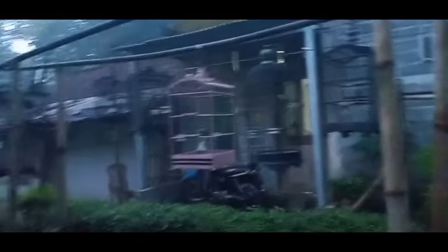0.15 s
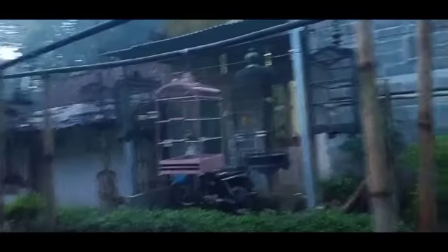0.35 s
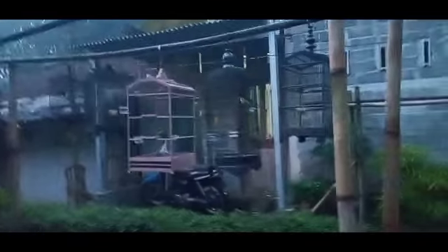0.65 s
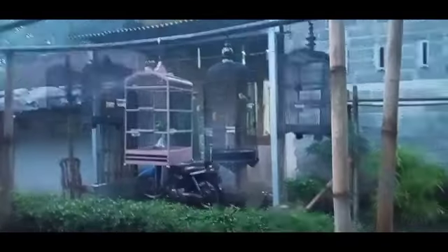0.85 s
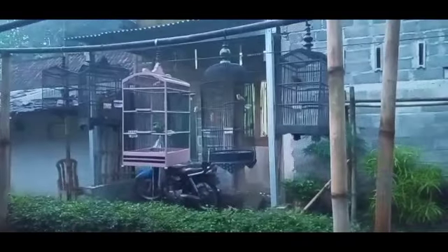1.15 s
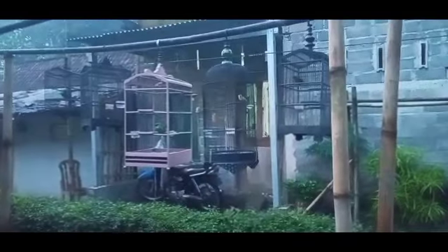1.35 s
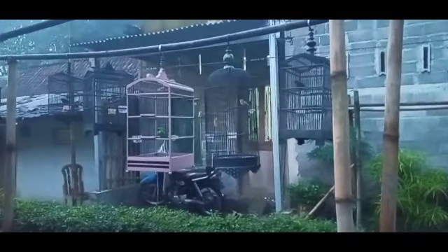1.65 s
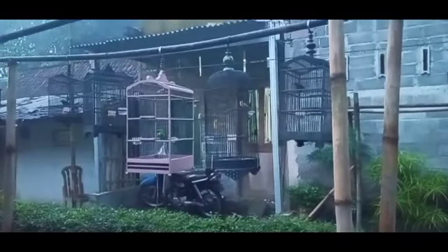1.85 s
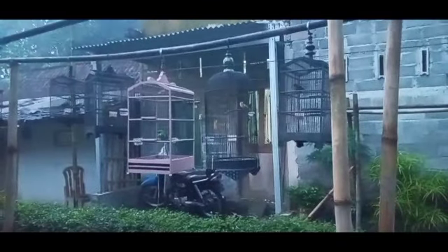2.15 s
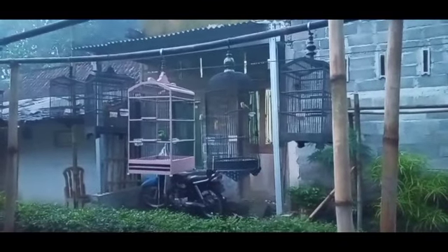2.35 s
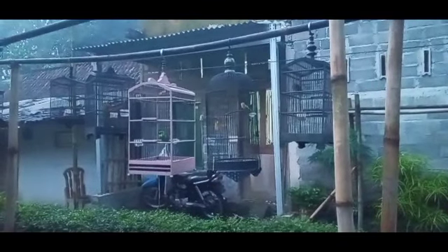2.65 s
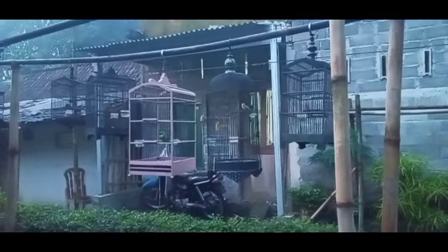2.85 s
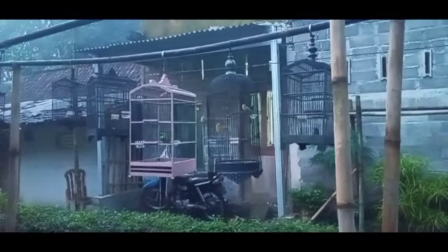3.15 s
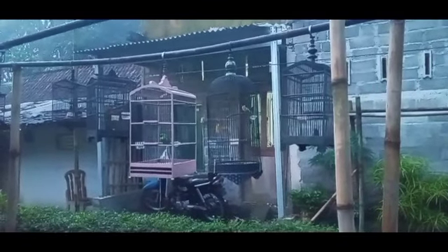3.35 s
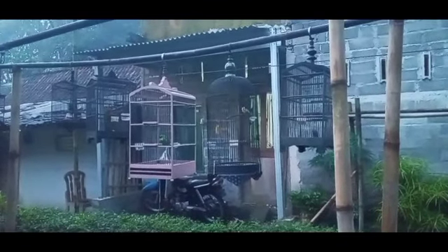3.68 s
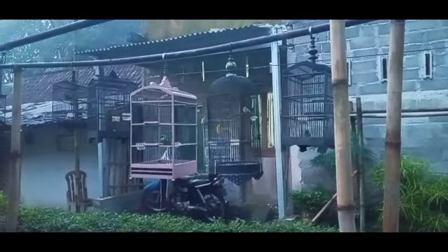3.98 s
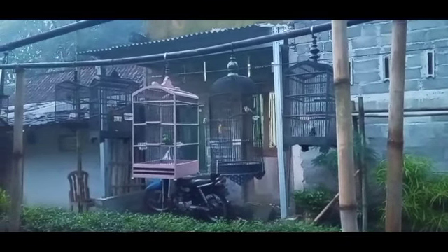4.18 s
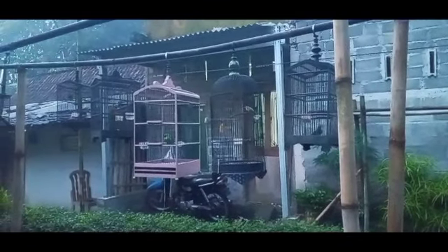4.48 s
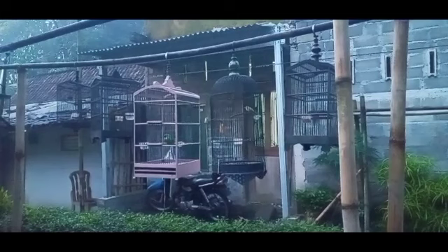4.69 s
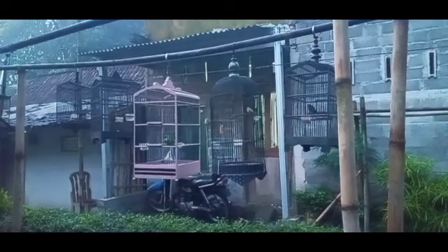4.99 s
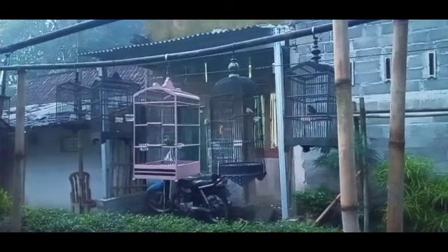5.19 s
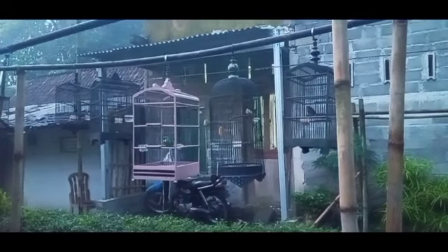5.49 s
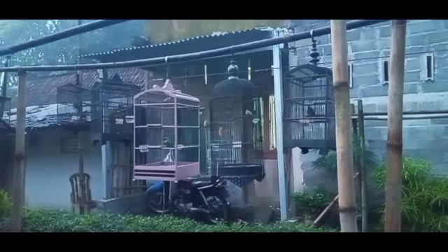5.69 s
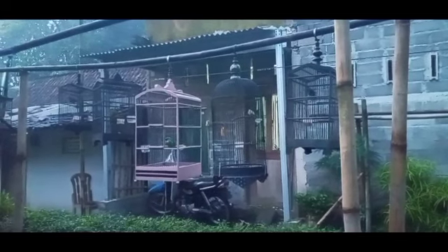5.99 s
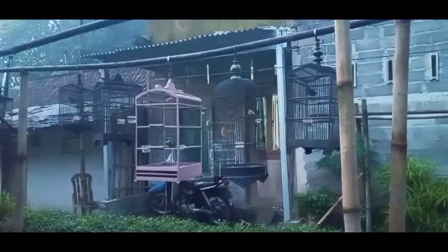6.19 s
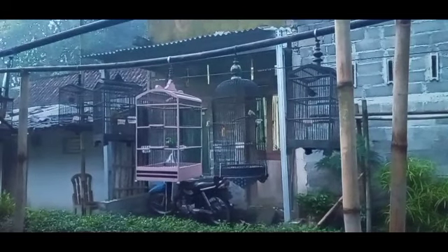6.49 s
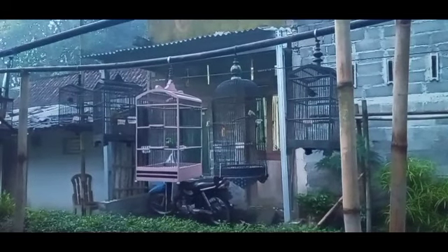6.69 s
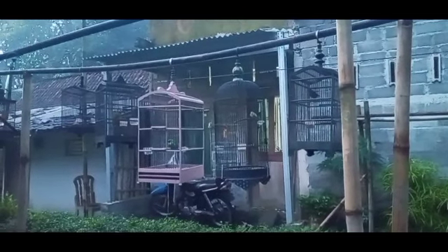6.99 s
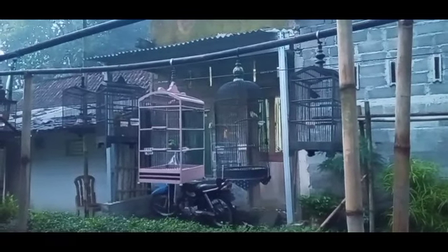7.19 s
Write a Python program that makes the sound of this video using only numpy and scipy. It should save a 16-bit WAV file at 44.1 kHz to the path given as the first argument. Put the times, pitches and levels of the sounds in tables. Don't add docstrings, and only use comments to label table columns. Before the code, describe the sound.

A close caged bird whistles bright, fluttering falling notes for the first three and a half seconds while another makes quick triple chips. The chips then repeat about four times a second, joined by thin whistles and buzzy calls from cages further off. A cricket chirps softly and roosters crow far away, clearest near the end. Stereo microphones near the cages catch hard wall echoes and faint traffic.

```python
import sys
import numpy as np
from scipy import signal
from scipy.fft import rfft, irfft, next_fast_len
from scipy.io import wavfile
from scipy.ndimage import uniform_filter1d

SR = 44100
rng = np.random.default_rng(int(sys.argv[2]) if len(sys.argv) > 2 else 0)


def linear_from_db(decibels):
    return 10 ** (np.asarray(decibels, float) / 20)


def file_out(sig):
    cols = np.atleast_2d(sig).T
    lim = np.clip(cols, -1, 1)
    pcm = np.round(lim * 32767).astype(np.int16)
    wavfile.write(sys.argv[1], SR, pcm)


N = 323694
LEFT_LAG = 50


def evened(x):
    return x / np.sqrt(np.mean(x ** 2) + 1e-20)


def read(points, hz):
    f, value = np.transpose(points)
    return np.interp(np.log(hz + 1), np.log(f + 1), value)


def curves(rows):
    s, *columns = np.transpose(rows)
    t = np.arange(s[0], s[-1], 1 / SR)
    return [t] + [np.interp(t, s, column) for column in columns]


def add(mix, s, sound):
    part = mix[max(round(s * SR), 0):][:len(sound)]
    part += sound[:len(part)]


def drift(length, size):
    noise = rng.standard_normal(length)
    return evened(uniform_filter1d(uniform_filter1d(noise, size), size))


def arch(share, top_at):
    before = 1 - share / top_at
    after = (share - top_at) / (1 - top_at)
    return np.where(share < top_at, before, after) ** 2


def right_gain(db):
    return linear_from_db([[0], [db]])


def whistle(hz, db, second_db, third_db, unsteady=0.0088):
    hz = uniform_filter1d(hz, size=70, mode="nearest") * (1 + unsteady * drift(len(hz), size=150))
    phase = 2 * np.pi * np.cumsum(hz) / SR
    tone = np.sin(phase) + linear_from_db(second_db) * np.sin(2 * phase)
    tone += linear_from_db(third_db) * np.sin(3 * phase) * (hz < SR / 6.2)
    sample = np.arange(len(hz))
    edge = np.minimum(np.minimum(sample, sample[::-1]) / 70, 1)
    return np.sqrt(2) * linear_from_db(db) * tone * edge


# f/Hz, t60/s
PORCH_DECAY = [(500, 0.89), (3000, 0.14), (5000, 0.41), (8000, 0.37), (15000, 0.24)]
# t/s, level/dB
WALL_ECHOES = [(.0021, 4), (.0047, -3.5), (.0083, 1.5), (0.0128, -0.5), (.018, -17.5), (0.026, -3.5)]


def porch(x, wall_db, tail_db):
    taps = np.zeros((2, SR // 2))
    at = np.arange(300, SR // 2 - 20, 20)
    at = at + rng.integers(0, 20, (2, len(at)))
    np.put_along_axis(taps, at, rng.choice([-1., 1.], at.shape), 1)
    hz, t, z = signal.stft(taps, SR, nperseg=256)
    decay = linear_from_db(-60 * t / read(PORCH_DECAY, hz)[:, None])
    tail = signal.istft(z * decay, SR, nperseg=256)[1]
    room = linear_from_db(tail_db) * tail / np.linalg.norm(tail[0])
    room[:, 0] += 1
    for s, db in WALL_ECHOES:
        at = (s * SR * rng.uniform(.9, 1.1, 2)).astype(int)
        room[[0, 1], at] += linear_from_db(db + wall_db) * rng.choice([-1, 1], 2)
    room[0] = np.roll(room[0], LEFT_LAG)
    return signal.fftconvolve(x[None], room / np.linalg.norm(room[0]), axes=1)[:, :N]


# f/Hz, level/dB per Hz
RUMBLE_SPECTRUM = [(15, -57), (25, -22), (91, 4.5), (189, -6), (225, -6), (254, -22.5), (317, -21.5),
                   (350, -29), (460, -55), (770, -120)]
# t/s, level/dB
TRAFFIC_LEVEL = [(0, -64.5), (.7, -61), (1.4, -62.5), (3.4, -62.5), (4.3, -62), (5.001, -63.5),
                 (5.801, -62), (6.4, -61), (7.34, -64)]


def traffic():
    size = next_fast_len(N)
    noise = rng.standard_normal((2, size))
    noise[1] = .93 * np.roll(noise[0], -LEFT_LAG) + .35 * noise[1]
    colour = linear_from_db(read(RUMBLE_SPECTRUM, np.fft.rfftfreq(size, 1 / SR)))
    low = evened(irfft(rfft(noise) * colour, size)[:, :N])
    level_db = np.interp(np.arange(N) / SR, *np.transpose(TRAFFIC_LEVEL))
    return low * linear_from_db(level_db + 1.1 * duck_db() + 2.5 * drift(N, size=1800))


# f/Hz, level/dB per Hz
AIR_SPECTRUM = [(150, -35), (250, -6), (444, -15.5), (618, -10.5), (1160, -15.5), (1500, -8.5), (1850, -12),
                (4340, -18), (5350, -17), (5930, -5), (6590, -22.5), (8400, -8.5), (10000, -45.5),
                (14900, -40.5), (16000, -33.5)]
# f/Hz, share
AIR_LIKENESS = [(60, .8), (240, 0.64), (950, 0.4), (3770, 0.17), (15000, .4)]


def air():
    frames, hz = N // 256 + 5, np.fft.rfftfreq(1024, 1 / SR)
    a, b, c, d, patches = rng.standard_normal((frames, 513, 5)).T
    patches = evened(uniform_filter1d(uniform_filter1d(patches, 8, 0), 16, 1))
    same = read(AIR_LIKENESS, hz)[:, None]
    left = a + 1j * b
    right = same * left + np.sqrt(1 - same ** 2) * (c + 1j * d)
    z = np.array([left, right])
    z[0] *= np.exp(-2j * np.pi * hz * LEFT_LAG / SR)[:, None]
    z *= linear_from_db(read(AIR_SPECTRUM, hz)[:, None] - read(LEFT_MICROPHONE, hz)[:, None] + 3.8 * patches)
    return linear_from_db(-51) * evened(signal.istft(z, nperseg=1024, noverlap=768)[1][:, :N])


# f/Hz, level/dB
CROW_THROAT = [(350, -22), (600, -1.5), (800, 1.5), (1150, -3.5), (1550, 2), (1950, 1.5), (2300, -8.5),
               (2800, 4.5), (3300, -17.5), (5000, -34.5)]


def crow(t, db, hz, hoarse):
    rough = .36
    bright_db = -18 + 34.5 * hoarse
    thin_db = 0.36 * np.maximum(db + 63.5, 0)
    jitter = .08 * rough * drift(len(t), size=200) + .008 * drift(len(t), size=1500)
    phase = np.pi * np.cumsum(hz * (1 + jitter)) / SR
    voice = np.zeros(len(t))
    for k in range(2, 11):
        line_db = read(CROW_THROAT, k * hz / 2) + bright_db * (k > 4) - thin_db * (k == 2)
        voice += linear_from_db(line_db) * (hoarse if k % 2 else 1) * np.sin(k * phase)
    rasp = 1 + 0.62 * rough * drift(len(t), size=60)
    return np.sqrt(2) * linear_from_db(db) * voice * rasp * signal.windows.tukey(len(t), .06)


# t/s, length/s, level/dB, top f/Hz, hoarseness/0-1
CROWS = [
    (3.8, .12, -72, 683, 0.2),
    (4.1, .7, -67, 781, .1),
    (5.66, .66, -56.5, 791, 0.61),
    (6.219, 0.16, -51.5, 639.5, .05),
    (6.442, .89, -51, 746.5, 0),
    (6.839, 0.26, -58.5, 1007, .15),
    (7.09, .24, -51.5, 606, 0.09),
]
# t/s, level/dB, f/Hz, hoarseness/0-1
WIDE_CROW = [(1.33, -71.5, 670, 0), (1.48, -54.5, 800.6, 0.53), (1.58, -50.5, 863.4, 0.62),
             (1.68, -63, 928, 0.2), (1.9, -51.5, 816.6, 0.45), (2.0, -66, 746, 0.42), (2.2, -73, 685, .2)]


def roosters():
    out = np.zeros(N)
    top_at, rise, sag_per_s = .33, .11, .17
    for s, length, level_db, top_hz, hoarse in CROWS:
        t = np.arange(0, length, 1 / SR)
        bend = arch(t / length, top_at)
        after = np.maximum(t - top_at * length, 0)
        climb = rise * length * bend * (after == 0)
        sag = sag_per_s * (1 + 2 * hoarse) * after
        add(out, s, crow(s + t, level_db - 5 * bend, top_hz * (1 - climb - sag), hoarse))
    t, db, hz, hoarse = curves(WIDE_CROW)
    add(out, t[0], crow(t, db - 3.5, hz, hoarse))
    add(out, t[0], whistle(hz, db + 1.5, second_db=-33, third_db=-48, unsteady=0.0358))
    return porch(out, wall_db=1.0, tail_db=2.5) * right_gain(1.5)


# first chirp t/s, last chirp t/s, spacing/s, level/dB
CRICKET_BOUTS = [
    (.0493, .16, .1, -50),
    (1.3437, 1.53, .1836, -60),
    (3.8472, 4.28, .1076, -51),
    (4.4099, 4.52, .1073, -50),
    (4.7098, 5.15, .1075, -52),
    (5.271, 5.28, .108, -54),
    (5.4626, 5.79, .1079, -52),
    (5.9295, 5.94, .108, -50),
    (6.1206, 7.28, .1165, -53),
]


def cricket():
    out = np.zeros(N)
    t = np.arange(500) / SR
    swell = np.sin(np.pi * np.clip(t / 0.0091, 0, 1)) ** 2
    stroke = np.sin(2 * np.pi * 5960 * t) * swell
    for first, last, spacing, db in CRICKET_BOUTS:
        for s in np.arange(first, last, spacing):
            for k, uneven in enumerate(rng.standard_normal(5)):
                add(out, s - .005 + k / 63.0, linear_from_db(db + 1.0 + 2 * uneven) * stroke)
    return porch(out, wall_db=-12, tail_db=-9) * right_gain(2.5)


# t/s, length/s, level/dB
ROLLS = [
    (2.2, .8, -59.5),
    (5.028, .82, -58),
]


def roller():
    out = np.zeros(N)
    for s, length, db in ROLLS:
        turn = np.arange(0, length, 1 / SR) * 14.6 % 1
        beat = .15 + .85 * np.sin(np.pi * turn)
        beat *= .65 + .35 * np.cos(2 * np.pi * 3 * turn)
        note = whistle(2950 - 120 * turn, db + 10.5, second_db=-44.5, third_db=-55.0, unsteady=0.016)
        add(out, s, beat * note)
    return porch(out, wall_db=-2, tail_db=0) * right_gain(2.5)


# t/s, peak level/dB, centre f/Hz
HOPS = [
    (0.944, -51.5, 1807),
    (3.105, -55, 1494),
    (4.615, -56, 2520),
    (6.31, -49.5, 1800),
]


def perches():
    out = np.zeros(N)
    t = np.arange(2600) / SR
    swell = np.sin(np.pi * t / t[-1]) ** 2
    for s, db, hz in HOPS:
        band = signal.butter(2, [hz / 1.1, hz * 1.42], "bandpass", fs=SR, output="sos")
        rattle = evened(signal.sosfilt(band, rng.standard_normal(len(t))))
        add(out, s - .01, linear_from_db(db) * rattle * swell)
    return np.array([out, np.roll(out, -LEFT_LAG)]) * right_gain(1.5)


# t/s, length/s, level/dB
RISERS = [
    (3.747, 0.23, -31.5),
    (4.114, 0.16, -41),
    (4.412, 0.11, -41),
    (4.571, 0.054, -39.5),
]
# t/s, length/s, first f/Hz, last f/Hz, peak level/dB
GLIDES = [
    (0, 0.067, 3580, 3470, -45),
    (0, 0.019, 5370, 4160, -33),
    (0, 0.025, 7700, 7180, -53),
    (0.259, 0.12, 7897, 5970, -30.5),
    (2.522, 0.11, 8100, 5890, -29.5),
    (3.272, 0.11, 7600, 6570, -47.5),
    (4.824, 0.14, 616, 602, -59),
    (4.905, 0.075, 15150, 14590, -76),
    (5.888, 0.095, 7950, 5220, -33),
    (7.099, .11, 3245, 2880, -29.5),
]
# t/s, f/Hz, level/dB
LOW_ARCH = [(6.6, 1552, -41.5), (6.63, 1870, -44), (6.68, 1850, -44), (6.73, 1572, -41), (6.78, 1396, -45)]


def far_calls():
    for s, length, level_db in RISERS:
        t = np.arange(0, length, 1 / SR)
        low = np.exp(-t / 0.0121)
        hz = 7620 - (7620 - 6600) * low - 1800 * t
        yield s + t, hz, level_db - 8 * low - 53 * t
    for s, length, first_hz, last_hz, peak_db in GLIDES:
        t = np.arange(0, length, 1 / SR)
        hz = last_hz + (first_hz - last_hz) * (1 - t / length) ** 1.3
        yield s + t, hz, peak_db - 15 * arch(t / length, 0.54)
    yield curves(LOW_ARCH)


def far_birds():
    out = np.zeros(N)
    for t, hz, db in far_calls():
        buzz = .08 * np.sin(2 * np.pi * 85 * t) * (hz[0] > 7200)
        second_db = -14 - 46 * (hz[0] > 2500)
        call = whistle(hz * (1 + buzz), db - 1.0, second_db, third_db=-57.5, unsteady=0.012)
        add(out, max(t[0] - .006, 0), call)
    return porch(out, wall_db=2, tail_db=7) * right_gain(2.5)


# first chip t/s, peak level/dB
TRIPLES = [(0.078, -27.5), (0.3206, -32.5), (1.606, -47), (3.4885, -31), (3.715, -27.5), (3.932, -27.5),
           (4.1775, -26.5), (4.3977, -27), (4.6417, -27), (4.8866, -27), (5.132, -26.5), (5.3765, -26),
           (5.6249, -26.5), (5.8673, -26.5), (6.111, -26.5), (6.4615, -41)]
# t/s, f/Hz, level/dB
CHIP = [(0, 5180, -9.5), (.004, 4920, 3.5), (.011, 4610, 6.5), (.016, 4300, -0.5), (.021, 4090, -1),
        (.027, 3850, -25)]


def chipper():
    out = np.zeros(N)
    gap_s = .0352
    t, hz, db = curves(CHIP)
    for s, peak_db in TRIPLES:
        for k, step_db in enumerate((0, .5, .8)):
            chip = whistle(hz, db + peak_db + step_db - 3.0, second_db=-36, third_db=-63.0)
            add(out, s - .0095 + k * gap_s, chip)
    slap = linear_from_db(-15) * np.roll(out, round(.073 * SR))
    return porch(out + slap, wall_db=-12, tail_db=-8)


# t/s from the start, f/Hz, effort level/dB
STAIR = [(0, 6501, -2.5), (.012, 7030, 0.5), (.032, 6360, 2.5), (.045, 5314, -0.5), (.068, 5050, -5),
         (.09, 4300, -2), (.122, 4054, -0.5), (.138, 3090, -25.5)]
FALL = [(0, 7100, -2.5), (.017, 6600, 5), (.033, 6170, 1), (.042, 5280, -1.5), (.065, 5245, -1),
        (.122, 4130, -5), (.157, 3990, 0.5), (.18, 3085, -24)]
DIVE = [(0, 8120, -10), (.02, 6740, 3.5), (.035, 5214, -1.5), (.05, 4987, -1), (.06, 4447, -3),
        (.118, 4082, 2), (.14, 3010, -26)]
HOOK = [(0, 8020, -9), (.017, 7470, -1.5), (.028, 6176, -0.5), (.047, 6043, 0.5), (.068, 6753, -2),
        (.105, 6170, 2), (.16, 4850, -3.5), (.197, 4620, -2), (.212, 4067, -6.5)]
KINK = [(0, 7533, -13.5), (.01, 6636, 5), (.028, 6475, 2), (.048, 5240, 0), (.064, 5990, 3.5),
        (.095, 5300, 0), (.122, 4960, 0), (.145, 4100, -14.5)]
SHELF = [(0, 7107, -4.5), (.02, 6230, 4.5), (.035, 5596, 3), (.075, 5307, -4.5), (.098, 5600, 1.5),
         (.148, 3928, -5)]
TICK = [(0, 5610, -3.5), (.01, 6303, 4), (.028, 5300, -1), (.048, 4117, -9)]
SCOOP = [(0, 6690, 3), (.023, 6240, 4.5), (.038, 5150, -4.5), (.058, 4210, -10), (.093, 4020, -0.5),
         (.113, 4867, -1.5), (.16, 5140, 0), (.23, 5064, 0), (.285, 4857, -8.5)]
# syllable, t/s, length/s, first f/Hz, level/dB
SONG = [(FALL, .21, .135, 7200, -19.5), (SCOOP, .42, .285, 6820, -19.5), (FALL, 0.7666, .175, 7100, -18.5),
        (SHELF, 0.97, .148, 7100, -18), (HOOK, 1.652, .216, 8050, -18), (HOOK, 1.995, .21, 8050, -17),
        (TICK, 2.335, .048, 5900, -18), (STAIR, 2.408, .138, 6500, -18), (TICK, 2.645, 0.047, 5600, -19),
        (STAIR, 2.72, .135, 6400, -19), (KINK, 2.992, .145, 7520, -19), (DIVE, 3.23, .14, 8100, -19),
        (TICK, 3.412, .045, 5450, -19), (STAIR, 3.484, .146, 6650, -19), (DIVE, 7.272, 0.1501, 8240, -21.5)]
# start t/s, a crest t/s, rate f/Hz, depth/share of pitch
WARBLE = (.51, .56, 25, .075)


def singer():
    out = np.zeros(N)
    start, crest, per_s, depth = WARBLE
    for shape, s, length, first_hz, level_db in SONG:
        at, hz, effort_db = np.transpose(shape)
        note = [s + at * length / at[-1], hz * first_hz / hz[0], level_db + effort_db]
        t, hz, db = curves(np.transpose(note))
        turn = 2 * np.pi * per_s * (t - crest)
        warble = depth * (np.cos(turn) + .6 * np.cos(3.4 * turn + 1.2) - .3)
        warble *= np.clip((t - start) / .02, 0, 1) * (t < .72)
        flutter = .016 * np.sin(2 * np.pi * 42 * (t - t[0]))
        tone = whistle(hz * (1 + warble + flutter), db + 0.5, second_db=-37.0, third_db=-39.5)
        add(out, t[0] - .005, tone)
        flick_hz = np.linspace(.45, 1.12, 200) * hz[0]
        flick_db = -36 + 9 * (hz[0] > 6950)
        add(out, t[0] - .009, whistle(flick_hz, flick_db, second_db=-40, third_db=-60))
    return porch(out, wall_db=-4, tail_db=-3)


def duck_db():
    loud = np.zeros(N)
    for _, s, length, *_ in SONG:
        loud[round(s * SR):round((s + length + .03) * SR)] = 1
    return -7 * uniform_filter1d(loud, size=900)


def scene():
    background = air() + roosters() + cricket() + roller()
    birds = perches() + far_birds() + chipper() + singer()
    return traffic() + linear_from_db(duck_db()) * background + birds


def band_limit(x):
    return signal.sosfilt(signal.butter(12, 16830, fs=SR, output="sos"), x)


# f/Hz, level/dB
LEFT_MICROPHONE = [(100, -1.5), (1000, 2.5), (3000, 2), (6000, 3), (8500, 5.5), (10500, -14),
                   (13000, -10.5), (15300, 24.5), (15750, 8), (16100, -26.5)]
RIGHT_MICROPHONE = [(100, -2.5), (1000, -3.5), (3000, -5), (6000, -6), (7600, -14), (9000, -17.5),
                    (10500, -11.5), (13000, -2), (15300, 28.5), (15750, -3), (16100, -36)]


def record(dry):
    size = next_fast_len(N + 4096)
    hz = np.fft.rfftfreq(size, 1 / SR)
    colour = linear_from_db(np.array([read(LEFT_MICROPHONE, hz), read(RIGHT_MICROPHONE, hz)]))
    mix = irfft(rfft(dry, size) * colour, size)[:, :N]
    return band_limit(mix)


dry = scene()
out = record(dry)
file_out(out)
```